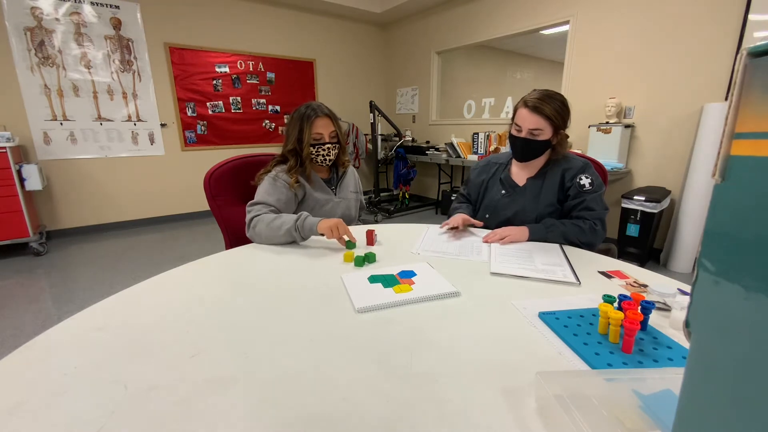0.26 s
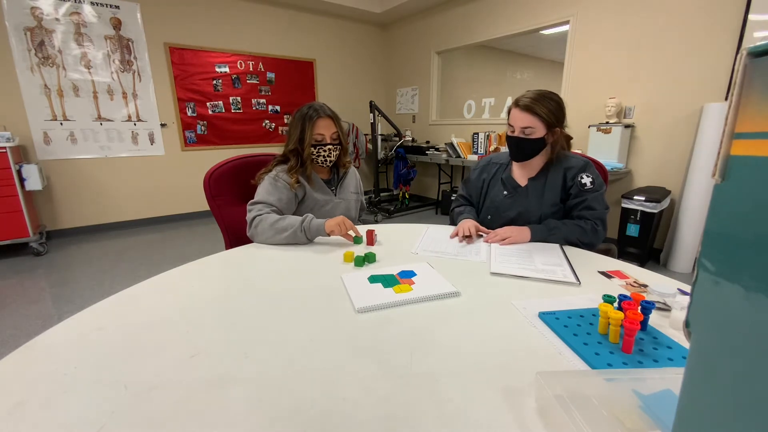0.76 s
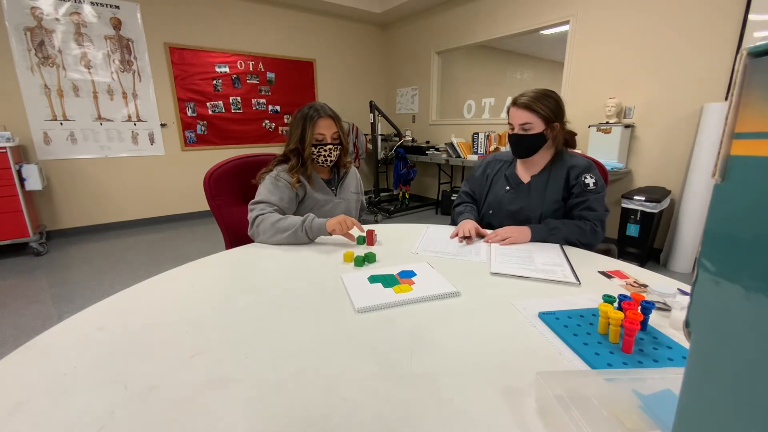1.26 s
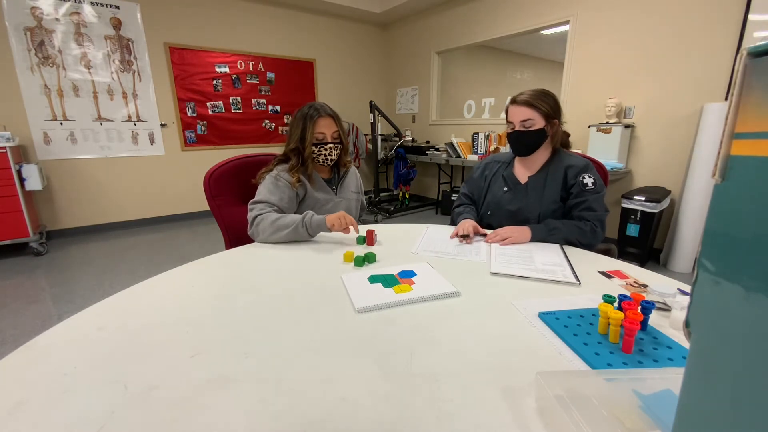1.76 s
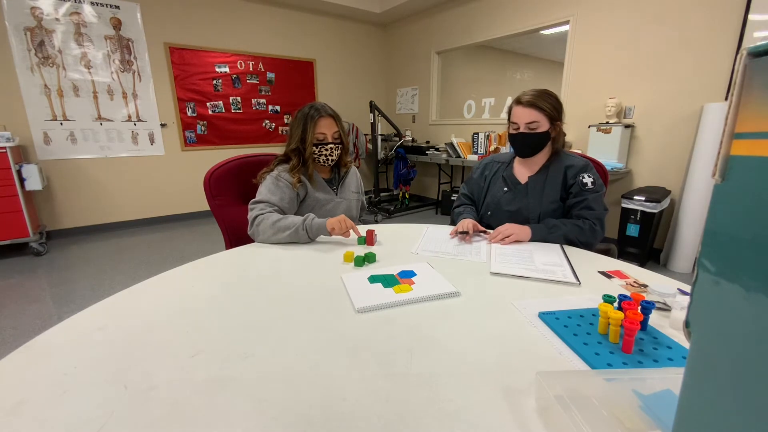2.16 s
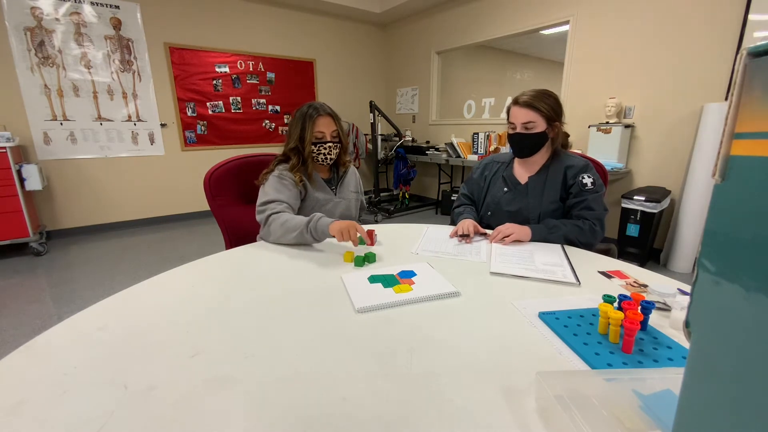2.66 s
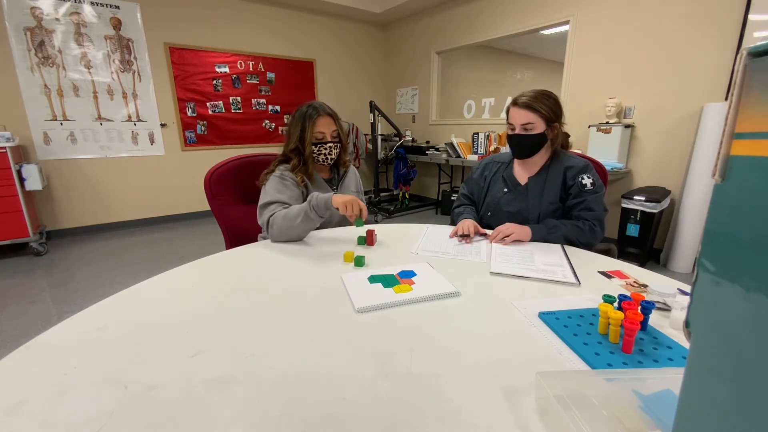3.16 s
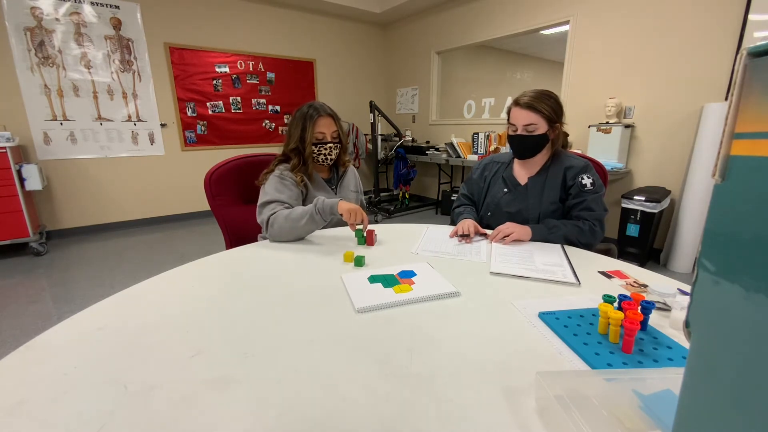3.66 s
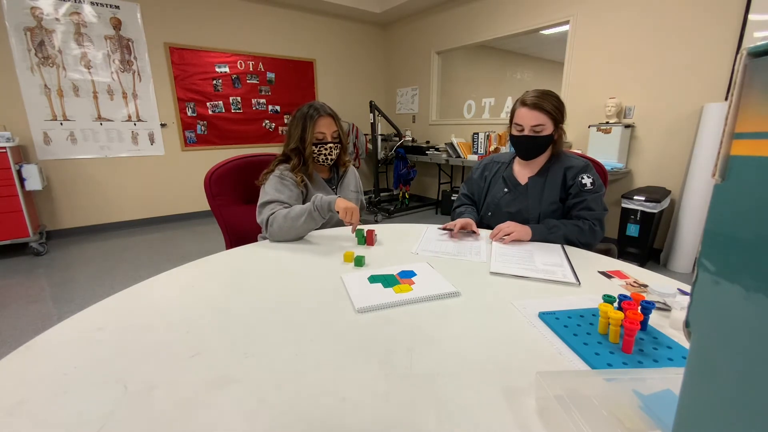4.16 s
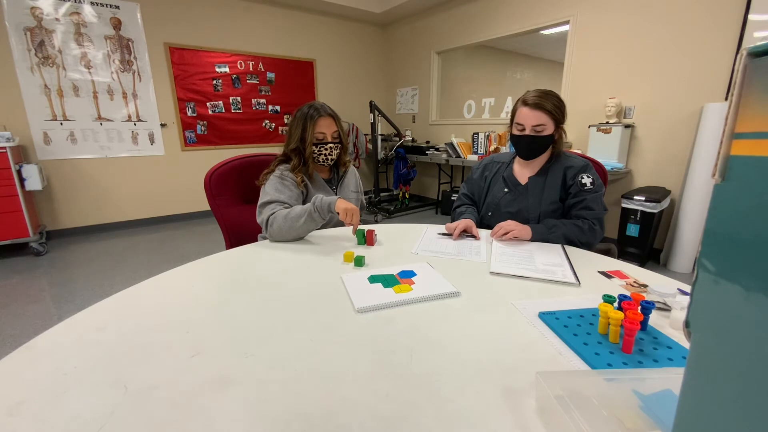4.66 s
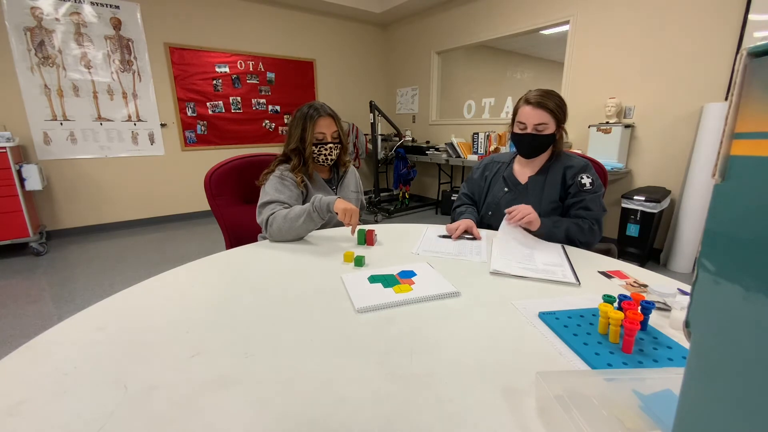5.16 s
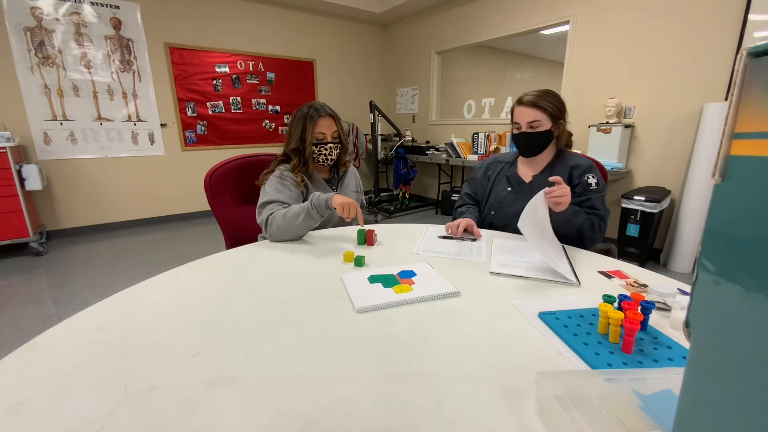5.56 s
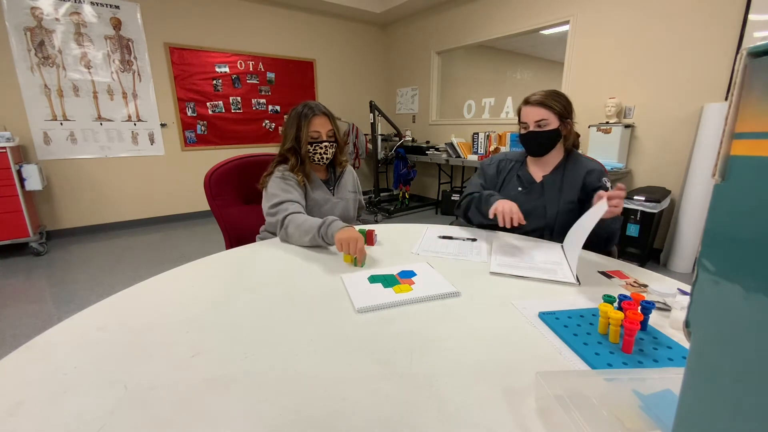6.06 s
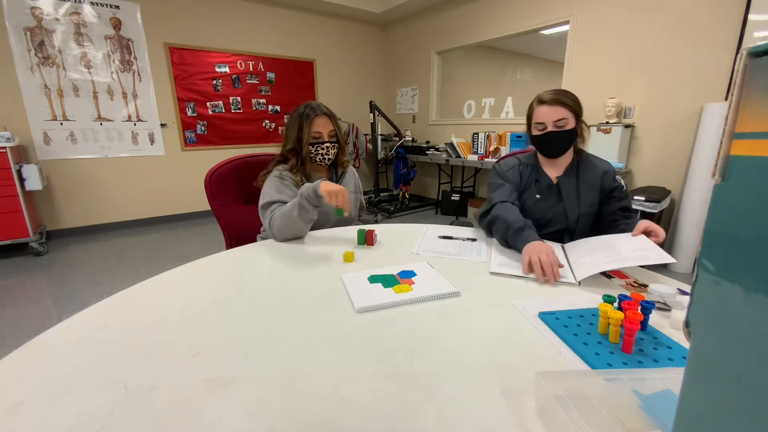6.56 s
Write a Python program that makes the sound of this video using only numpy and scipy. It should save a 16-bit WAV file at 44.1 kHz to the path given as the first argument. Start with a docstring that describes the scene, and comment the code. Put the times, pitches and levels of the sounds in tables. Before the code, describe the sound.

Small wooden blocks click, knock and slide on a hollow table in a quiet room, with soft brushing of sleeves and paper.

```python
"""A quiet room, at a large hollow table, heard through a two-port stereo microphone.
Small wooden blocks are knocked together, set down and pushed about: each contact clicks, rings the
block and booms the table, and sliding wood sticks and slips. Sleeves and paper brush the top, nails
tick, a fingertip judders and arms thump it. Far off a fan hums, behind short echoes and a faint hiss."""
import sys
import numpy as np
from scipy import signal
from scipy.fft import rfft, irfft, next_fast_len
from scipy.io import wavfile
from scipy.ndimage import uniform_filter1d, map_coordinates

SR = 44100
rng = np.random.default_rng(int(sys.argv[2]) if len(sys.argv) > 2 else 0)


def materialize(psi):
    """Save the field psi as 16-bit PCM at rate SR to the path in sys.argv[1].

    A 1-D psi becomes a single channel; in a 2-D psi each row is a channel.
    """
    bounded = np.clip(np.atleast_2d(psi).T, -1, 1)
    quanta = np.round(bounded * 32767).astype(np.int16)
    wavfile.write(sys.argv[1], SR, quanta)


N = 300762

# Modes of the table, of a block, and the small high ones that a hard contact rings.
# Each row: pitch in Hz, level in dB, nominal t60 in seconds.
TABLE_MODES = [(130, -2.5, 0.079), (209, 0.5, 0.099), (259.7, -1.5, 0.073), (325.3, 3.5, 0.12),
               (422, -2, 0.06), (470.8, -1.5, 0.087), (579.4, -5, 0.019)]
BLOCK_MODES = [(710, 0.5, 0.022), (817.5, 4.5, 0.034), (951, 5, 0.0239), (1117, 9.5, 0.034),
               (1278, 4.5, 0.019), (1503, 3, 0.021), (1637, -1, 0.012), (2120, -5, 0.0073)]
CLICK_MODES = [(2900, 10.5, 0.0036), (3560, 11.5, 0.0041), (4250, 6.5, .007), (5430, 5, 0.016)]
DEEP, LOWER = 4, 5  # how many modes count as the table's deepest and the block's lower ones
SOFT_HZ = 1600  # slips, and blows to the block's lower modes, roll off above this
# The bright edge of a knock. Each row: frequency in Hz, gain in dB.
EDGE_SPECTRUM = [(3500, -18.5), (5000, 2), (8000, 7.5), (13000, 1.5), (15600, -1.5), (16500, -23)]
# Blocks landing. Each row: start in seconds, block level in dB, upper modes and table boom in dB re
# block, deepest modes in dB re boom, click and bright edge in dB re block, settling time in ms.
BLOCK_KNOCKS = [(0.111, 5, -6.5, 10, -10.5, -36.5, -41.5, 2.85), (0.156, 3.5, 1, 2, -12, -34, -63, 4),
                (0.32, 7, -4.5, -3, -3, -33, -50, 0.96), (0.418, -1, -3.5, 4, -1, -35.5, -56.5, 3.8),
                (0.577, -5, -12, -9, -1, -48, -58, 1.7), (0.663, -21, -16, -11, -10, -51, -64, 0.87),
                (0.696, -16, -16, -4, -9, -50, -67, 1.7), (1.824, -17.5, -16, 5.5, -11, -55.5, -59, 1.26),
                (1.836, -7.5, -6, 5.5, -2.5, -32, -46, 4.3), (2.2899, -27, 10, -26, -7, -1, -10, 1.2),
                (2.773, -8.5, -7, 11, -4, -36, -54, 2.8), (2.786, -9, -8, 13, 1, -36, -61, 1.7),
                (2.95, -46.5, -12, 29, 5, -33, -28, 2.5), (3.179, -18.5, 6, -2, 19, -27, -58, 2.6),
                (3.235, -15.5, 1, 5.5, 3, -36, -47, 1.33), (3.565, -4.5, 3, 10.5, -6, -23, -55, 0.2),
                (3.59, -17.5, 5.5, 21, -5, -38, -68, 3.2), (3.699, -18, -14, 8, 6, -53, -54, 0.31),
                (4.183, -31.5, 6.5, 5, -14, -12, -9, 6.6), (4.292, -32.5, -20, 6, 1, -24, -8, 0.97),
                (4.712, -21.5, 4.5, 2.5, 17, -44, -46, 1), (4.727, -16, 4, 4, -29.5, -26, -32, 10.7),
                (4.782, -20.5, -2, 20, -3.5, -33, -40, 2.2), (5.035, 0.5, -3, 4.5, -19, -29, -16.5, 0.67),
                (5.044, -17.5, -19, 10, 4.5, -44.5, -10, 0.48), (5.057, -23.5, -19, -6, 0, -33, -2.5, 0.6),
                (5.066, -25, 0, -3, -3, -33, -9.5, 0.5), (5.234, -16.5, -16, 10.5, -5, -31, -26, 1.2),
                (5.316, -29, -9, 24.5, -3.5, -18.5, -29, 1.57), (5.69, -34.5, 11.5, 10, 21, -4, -7.5, 3.4),
                (6.019, -8.5, 9.5, 3, 8.5, -21.5, -42.5, 0.38), (6.036, 5, -2, 5.5, 3.5, -29, -30.5, 0.44)]
def knocks():
    """Each contact clicks, rings the block and booms the table, deeper or tighter by where it lands."""
    force, t = np.zeros((6, N + SR)), np.arange(2048) / SR
    for start, db, upper_db, boom_db, deep_db, click_db, edge_db, settle_ms in BLOCK_KNOCKS:
        # the wood settles first; the shorter click comes 1 ms later, at full contact
        contact_s = max(settle_ms, .1) * np.array([[1], [.6]]) / 1000
        age = np.maximum(t - [[0], [.001]], 0) / contact_s
        jolts = rfft(age * np.exp(-age) * rng.standard_normal(age.shape))
        blows = irfft(jolts / np.abs(jolts) ** .7)  # a blow is rich in every frequency
        wood, click = blows / np.linalg.norm(blows, axis=1, keepdims=True)
        levels = amp(db + np.array([0, upper_db, boom_db, boom_db + deep_db, click_db, edge_db]))
        force[:, round(start * SR):][:, :len(t)] += levels[:, None] * ([wood] * 4 + [click] * 2)
    paths = lambda hz: [
        modes(BLOCK_MODES[:LOWER], hz, widen=1.7) / (1 - (hz / SOFT_HZ) ** 2 + 1j * hz / SOFT_HZ),
        -modes(BLOCK_MODES[LOWER:], hz, widen=1.8),
        modes(TABLE_MODES[DEEP:], hz, widen=2.2),
        modes(TABLE_MODES[:DEEP], hz, widen=2.4),
        modes(CLICK_MODES, hz, widen=1.8),
        amp(along(EDGE_SPECTRUM, hz))]
    return filtered(force[:, :N], paths).sum(axis=0)


# Blocks pushed over the top, and something lighter and higher. Each row: time of full speed, swell,
# hold and fade in seconds, scrape level in dB, table drone and deepest modes in dB re scrape.
BLOCK_DRAGS = [(0.0, .05, 0.015, 0.25, -35.5, -1.5, -3), (0.145, 0.3, 0.028, 0.15, -32.5, -3, -16),
               (0.335, 0.06, 0.011, 0.08, -37, -6.5, -7), (0.5, 0.063, 0.3, 0.026, -53, 0, -6),
               (0.85, 0.1, 0.082, 0.11, -65, 6, 7.5), (1.085, 0.048, 0.052, 0.053, -75.5, 2.5, 3.5),
               (1.3, 1, 0.22, 0.19, -95.5, 12, 17.5), (2.4, 0.29, 0.062, 0.14, -118, 36.5, 14.5),
               (2.69, 0.12, 0.073, 0.032, -63.5, -6, -4.5), (2.93, 0.0055, 0.082, 0.05, -83, 14.5, 25),
               (3.1, 0.19, 0.026, 0.046, -74, -29, 2), (4.19, 0.021, 0.029, 0.047, -66, -13.5, -8.5),
               (4.31, 0.015, 0.017, 0.038, -86.5, 17.5, 23), (4.95, 0.055, 0.035, 0.088, -64, 0.5, 0.5),
               (5.71, 0.23, 0.22, 0.051, -73.5, 5.5, 9), (6.0, 0.068, 0.029, 0.077, -50, -11, -5),
               (6.17, 0.12, 0.11, 0.99, -68, 6, 3)]
LIGHT_SCRAPES = [(3.195, 0.02, 0.044, 0.13, -53.5, -11, -12.5), (6.443, 0.006, 0.063, 0.14, -57, -22, -2.5),
                 (6.591, 0.0038, 0.1, 0.104, -56, -14, -1.5)]
# Resonances of the light scrape. Each row: pitch in Hz, width in Hz, level in dB.
RASP_MODES = [(1215, 222, 7), (1920, 660, -1.5), (2190, 250, 2.5)]
# Weak grit above a block's soft slips. Each row: frequency in Hz, relative level in dB.
GRIT_SPECTRUM = [(1500, -8), (2150, 6), (2550, -7), (3100, -6), (4200, -32.5)]
def drags():
    """Stick and slip sends uneven little jolts into block and table alike."""
    scrape, *table_under_block = strokes(BLOCK_DRAGS)
    rasp, *table_under_rasp = strokes(LIGHT_SCRAPES)
    drone, deep = np.add(table_under_block, table_under_rasp)
    jolts = rng.standard_normal(N) * amp(3 * wobble(260) + 1.5 * wobble(40))

    def rubbed(body, widen):
        return unit(filtered(jolts, lambda hz: modes(body, hz, widen) / (1 + (hz / SOFT_HZ) ** 8)))

    block = rubbed(BLOCK_MODES, widen=4.76) + amp(-14.5) * unit(coloured(jolts, GRIT_SPECTRUM))
    light = unit(filtered(jolts, lambda hz: resonances(RASP_MODES, hz)))
    table = drone * rubbed(TABLE_MODES[DEEP:], widen=2.2) + deep * rubbed(TABLE_MODES[:DEEP], widen=4.2)
    return scrape * block + rasp * light + table


# The hiss of fibres and its bright top octave. Each row: frequency in Hz, relative level in dB.
CLOTH_SPECTRUM = [(1500, -10), (2500, -6.5), (3200, -7), (4000, -5.5), (5700, -4), (7200, -10.5), (8800, 0),
                  (11000, -51)]
SHEEN_SPECTRUM = [(10000, -30.5), (12000, -3), (15000, -5), (16300, -15.5)]
# Sleeves and paper crossing the table. Each row: time of full speed, swell, hold and fade in seconds,
# hiss level in dB, top octave in dB re hiss.
SLEEVE_STROKES = [(0.1, 0.54, 0.084, 0.17, -52.5, -9), (0.47, 0.088, 0.016, 0.14, -70, -5.5),
                  (0.9, 0.23, 0.044, 0.064, -68.5, -12.5), (1.35, 0.23, 0.057, 0.08, -77.5, -19),
                  (1.68, 0.23, 0.015, 0.047, -80, -18), (2.48, 0.061, 0.13, 0.16, -67.5, -19),
                  (2.66, 0.19, 0.098, 0.054, -62.5, -1.5), (3.07, 0.11, 0.11, 0.076, -66, -13.5),
                  (3.855, 0.049, 0.02, .03, -79, -9.5), (4.195, 0.05, 0.041, 0.035, -71, -10),
                  (4.73, 0.025, 0.042, 0.1, -77, -23), (5.33, 0.13, 0.0082, 0.031, -74.5, -16.5),
                  (5.4, .05, 0.41, .05, -81.5, -7), (5.74, 0.08, 0.23, 0.076, -71.5, -34),
                  (5.925, 0.093, 0.13, 0.049, -60, -4.5), (6.1, 0.057, 0.15, 0.95, -68, -12.5),
                  (6.41, 0.034, 0.08, 0.14, -74.5, -1.5), (6.62, 0.13, 0.11, 0.13, -63, -8)]
def brushes():
    """Sliding fibres make a fine hiss whose colour shifts in patches, with a bright top."""
    hiss, sheen = strokes(SLEEVE_STROKES)
    spectra = signal.stft(noise(CLOTH_SPECTRUM, grain_db=1.5), nperseg=512)[2]
    patches = uniform_filter1d(rng.standard_normal(spectra.shape), 12, axis=0)
    patches = unit(uniform_filter1d(patches, 12, axis=1))
    cloth = unit(signal.istft(spectra * amp(2.5 * patches), nperseg=512)[1][:N])
    return hiss * cloth + sheen * noise(SHEEN_SPECTRUM, grain_db=2.0)


# Nails, edges and paper touching. Each row: start in seconds, level in dB, pitch in Hz.
THIN_TICKS = [(1.2336, -67, 4340), (1.3098, -70, 3000), (1.4347, -66.5, 3720), (2.2552, -66.5, 4530),
              (2.3034, -68.5, 2890), (4.986, -67, 3600), (5.04, -46, 2930), (5.2435, -58, 6100),
              (5.3277, -56, 6030), (5.3827, -67, 3620), (5.443, -66, 3860), (5.484, -60.5, 5560),
              (5.715, -51, 2670)]
TICK_T60_S = .008
def ticks():
    """A light touch rings briefly at its own pitch, roughened by noise."""
    out, t = np.zeros(N + SR), np.arange(1024) / SR
    for start, db, hz in THIN_TICKS:
        ring = np.sin(2 * np.pi * hz * t) + 0.34 * rng.standard_normal(len(t))
        out[round(start * SR):][:len(t)] += amp(db - 60 * t / TICK_T60_S) * ring
    return out[:N]


def judder(start_s=.845, first_gap_s=.0098, gap_growth=1.033, slips=10, rise_db=.7):
    """A fingertip judders over the top, ever slower and stronger; each slip is a dying puff."""
    out, t = np.zeros(N + SR), np.arange(1024) / SR
    for k in range(slips):
        slip_s = start_s + first_gap_s * (gap_growth ** k - 1) / (gap_growth - 1)
        envelope = amp(-58.5 + rise_db * k - 60 * t / TICK_T60_S)
        out[round(slip_s * SR):][:len(t)] += envelope * rng.standard_normal(len(t))
    return coloured(out[:N], CLOTH_SPECTRUM)


# Arms leaning on the table. Each row: start in seconds, level in dB, pitch in Hz.
ARM_THUMPS = [(0.021, -37.5, 82), (0.857, -40, 98), (0.939, -41, 87.5), (2.789, -49.5, 95.4),
              (3.04, -51.5, 55), (4.79, -50, 104), (5.734, -47, 115), (6.048, -37, 62.7),
              (6.658, -47, 102.6)]
def thumps(rise_s=0.017, t60_s=0.29):
    """A soft push sets the whole top swinging at a low pitch."""
    out, t = np.zeros(N + SR), np.arange(SR // 2) / SR
    for start, db, hz in ARM_THUMPS:
        envelope = amp(db - 60 * t / t60_s) * (1 - np.exp(-t / rise_s))
        out[round(start * SR):][:len(t)] += envelope * np.sin(2 * np.pi * hz * t)
    return out[:N]


# Rumble of the air ducts. Each row: frequency in Hz, relative level in dB.
DUCT_SPECTRUM = [(20, -28.5), (35, -18.5), (62, 2.5), (100, -5), (118, -13), (135, -41)]
def fan(blade_hz=89.8):
    """Far off, a slightly unsteady blade tone hums over duct rumble."""
    phase = 2 * np.pi * np.cumsum(blade_hz + .5 * wobble(2.316)) / SR
    hum = amp(-61 + 1.3 * wobble(5)) * np.sin(phase)
    return hum + amp(-69.5 + 0.6 * wobble(6)) * noise(DUCT_SPECTRUM)


# The room's decay. Each row: frequency in Hz, t60 in seconds.
ROOM_DECAY = [(150, 0.8), (400, 0.55), (1000, 0.43), (2800, 0.49), (7000, 0.31)]
# The colour of its echoes at the microphone. Each row: frequency in Hz, gain in dB.
ECHO_COLOUR = [(200, 2.5), (1000, -2.5), (2500, -7.5), (5000, -10.5), (12000, -10)]
def room(x):
    """Each 0.2 s of sound gets its own tail: strong early echoes, then a wash whose treble dies first."""
    out, step, delay = np.zeros((2, N + 2 * SR)), SR // 5, 180
    for start in range(0, N, step):
        hz, t, spectra = signal.stft(rng.standard_normal((2, SR * 3 // 4)), SR, nperseg=256)
        t60 = along(ROOM_DECAY, hz)[:, None]
        tail = signal.istft(spectra * amp(-60 * t / t60) / np.sqrt(t60), SR, nperseg=256)[1]
        age_s = np.arange(tail.shape[1]) / SR
        tail *= 1 + 2.2 * np.exp(-age_s / 0.00883)  # the table top and near walls answer first
        tail /= np.linalg.norm(tail[0])
        tail[:, rng.integers(0, SR // 45, size=7)] += .17 * rng.uniform(-1, 1, size=(2, 7))
        wet = signal.fftconvolve(x[None, start:start + step], tail, axes=1)
        out[:, start + delay:][:, :wet.shape[1]] += wet
    return coloured(out[:, :N], ECHO_COLOUR)


# Room tone. Each row: frequency in Hz, relative level in dB.
AIR_SPECTRUM = [(74, -21), (125, -9), (313, -20), (1550, -21.5), (3270, -34.5), (4630, -41), (7100, -33.5),
                (10000, -34), (14500, -23.5), (15300, -38), (15900, -51)]
def room_hiss():
    """A faint, steady hiss lies all around the microphone."""
    return amp(-83.0) * np.array([noise(AIR_SPECTRUM), noise(AIR_SPECTRUM)])


def amp(db):
    return 10 ** (np.asarray(db) / 20)


def unit(x):
    return x / np.sqrt(np.mean(x ** 2) + 1e-20)


def along(points, hz):
    """Interpolate (Hz, value) points on a log frequency axis."""
    knots_hz, values = np.transpose(points)
    return np.interp(np.log(hz + 1), np.log(knots_hz + 1), values)


def strokes(rows, range_db=20):
    """Gain curves, one per level column: a stroke climbs range_db in its swell and sinks it in its fade."""
    t, power = np.arange(N) / SR, 0
    for full_s, swell, hold, fade, db, *relative_db in rows:
        before = np.maximum(full_s - t, 0) / max(swell, .005)
        after = np.maximum(t - full_s - hold, 0) / max(fade, .005)
        levels = amp(db + np.array([0, *relative_db]))[:, None]
        power = power + (levels * amp(-range_db * (before + after))) ** 2
    return np.sqrt(power)


def wobble(rate):
    """A smooth random curve, rate knots a second."""
    return map_coordinates(rng.standard_normal(int(N * rate / SR) + 4), [np.arange(N) * rate / SR])


def filtered(x, response):
    """Pass x through a complex response of frequency."""
    size = next_fast_len(N + SR // 2)
    return irfft(rfft(x, size) * response(np.fft.rfftfreq(size, 1 / SR)), size)[..., :N]


def coloured(x, spectrum):
    return filtered(x, lambda hz: amp(along(spectrum, hz)))


def noise(spectrum, grain_db=0):
    """Coloured noise of rms 1; grain makes it crackle."""
    return unit(coloured(rng.standard_normal(N) * amp(grain_db * wobble(300)), spectrum))


def resonances(rows, hz):
    """The summed response of resonators of alternating sign."""
    return sum((-1) ** k * amp(db) * 1j * hz * width / (pitch ** 2 - hz ** 2 + 1j * hz * width)
               for k, (pitch, width, db) in enumerate(rows))


def modes(body, hz, widen):
    """The response of a body; widen says how much the hand on it damps the ring."""
    return resonances([(pitch, widen / t60, db) for pitch, db, t60 in body], hz)


# How far diffuse sound differs between the ports. Each row: frequency in Hz, side gain in dB.
DIFFUSE_WIDTH = [(130, -38), (300, -8.5), (800, -5.5), (2500, 2.5), (5000, 0.5), (12000, -5.5)]
def scene():
    """Direct sound sits in the centre; echoes and hiss spread around it."""
    hits = knocks() + ticks() + judder()
    rubs = drags() + brushes()
    mid, side = room(hits + amp(-3.5) * rubs) + room_hiss()
    side = coloured(side, DIFFUSE_WIDTH)
    return hits + rubs + thumps() + fan() + np.array([mid + side, mid - side])


# Phase between the ports. Each row: frequency in Hz, lead of the left port in radians.
LEFT_LEAD = [(130, .08), (340, .5), (480, 1.3), (650, 3.1), (1030, 5.9), (1640, 6.2), (1890, 4.9),
             (3270, .8), (4130, -.5), (6630, -1.3), (8440, -2.9), (11500, -3.6), (12600, -5.9),
             (16000, -6.4)]
# Their balance. Each row: frequency in Hz, left over right in dB.
LEFT_BALANCE = [(150, -.5), (380, -4), (620, 0)]
# Overall tone colour: a lift near 700 Hz, a dip around 9-12 kHz. Each row: frequency in Hz, gain in dB.
TONE_COLOUR = [(100, 5), (400, -0.5), (680, 5), (1100, -4), (2400, 0.5), (4000, -1), (8200, -0.5),
               (9000, -12.5), (10900, -4.5), (11800, -7)]
TOP_HZ = 16400
def record(dry):
    """The ports differ in phase and a little in level; the tone is coloured, with nothing above TOP_HZ."""
    def response(hz):
        half = np.array([[.5], [-.5]])
        ports = np.exp(1j * half * along(LEFT_LEAD, hz)) * amp(half * along(LEFT_BALANCE, hz))
        return ports * amp(along(TONE_COLOUR, hz)) * (hz < TOP_HZ)
    return filtered(dry, response)


dry = scene()
out = record(dry)
materialize(out)
```